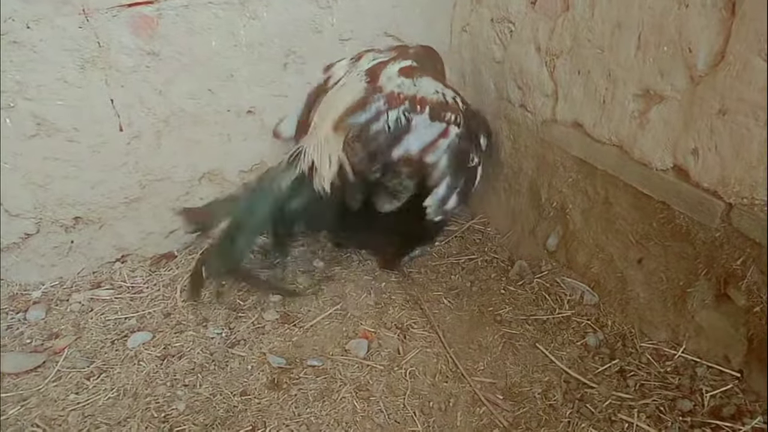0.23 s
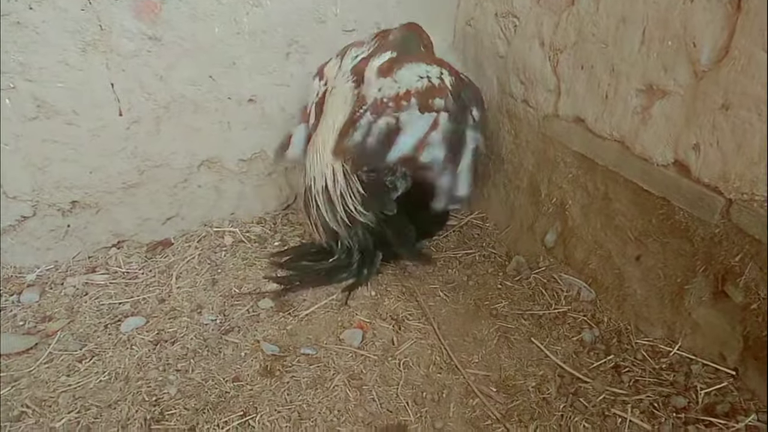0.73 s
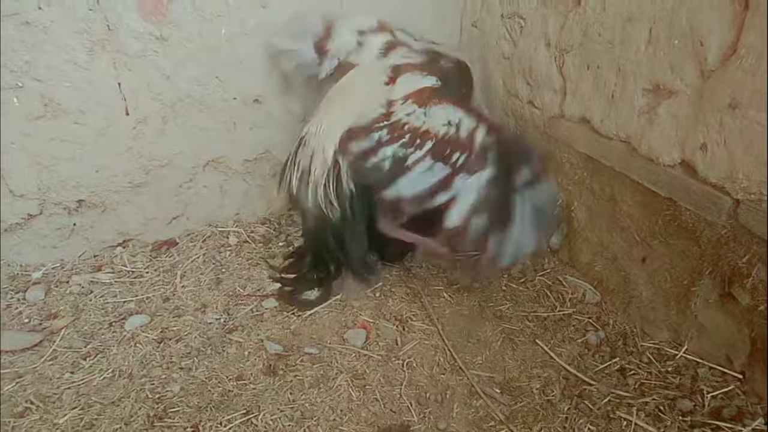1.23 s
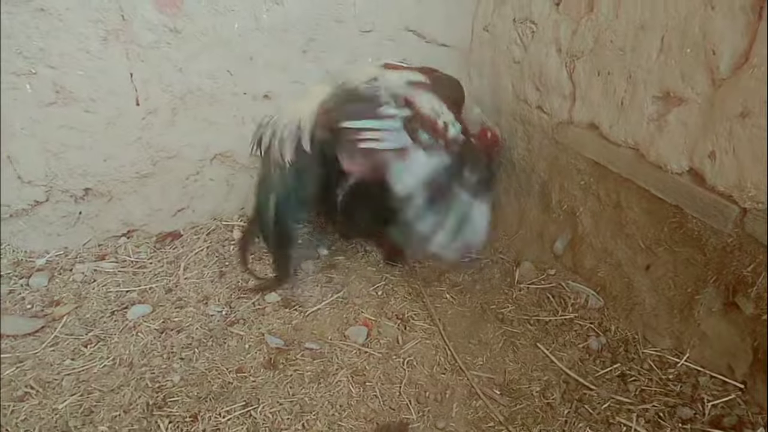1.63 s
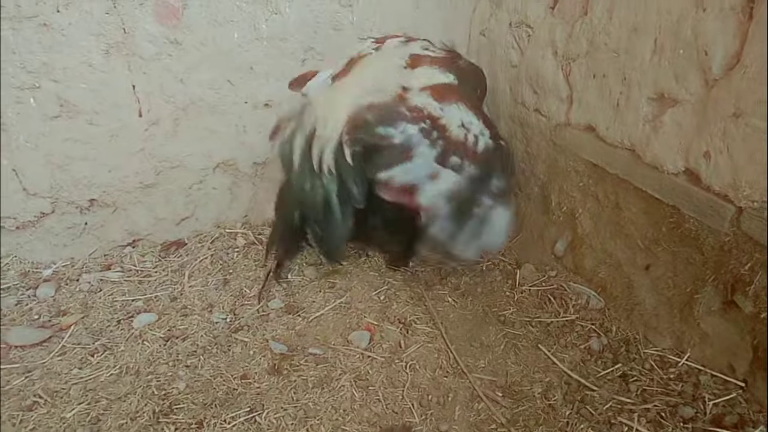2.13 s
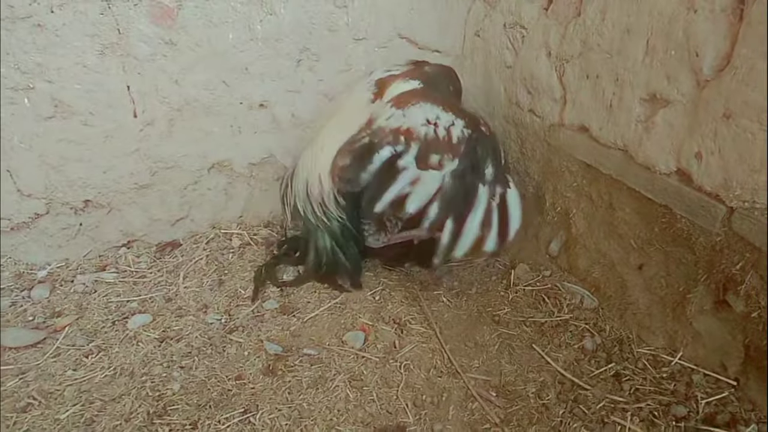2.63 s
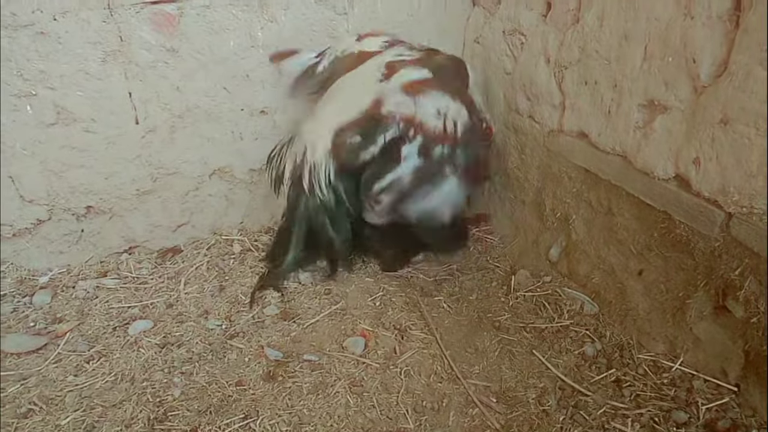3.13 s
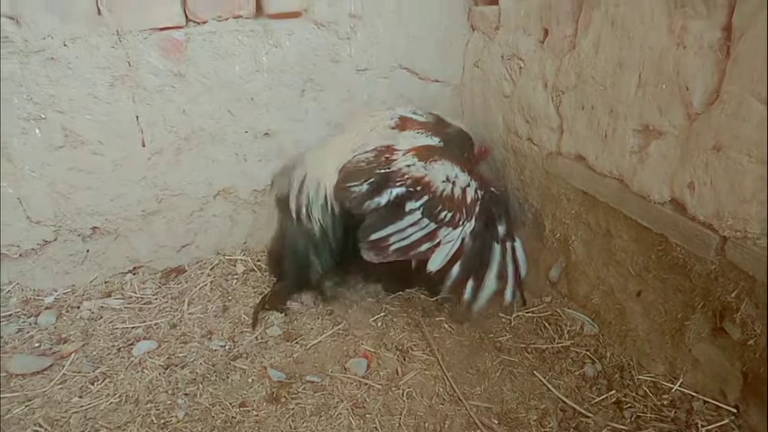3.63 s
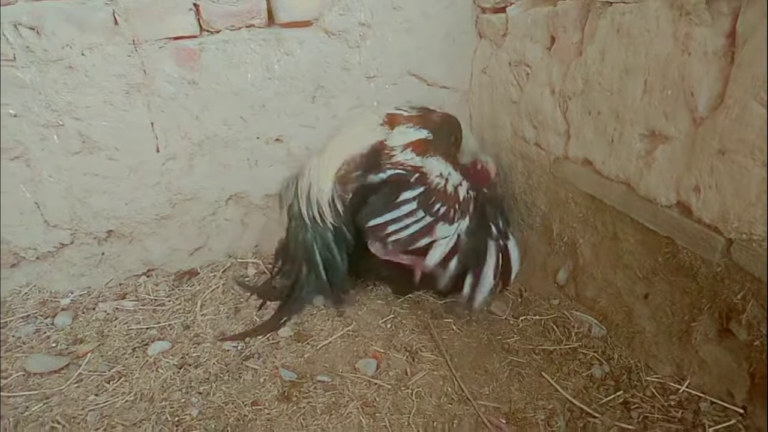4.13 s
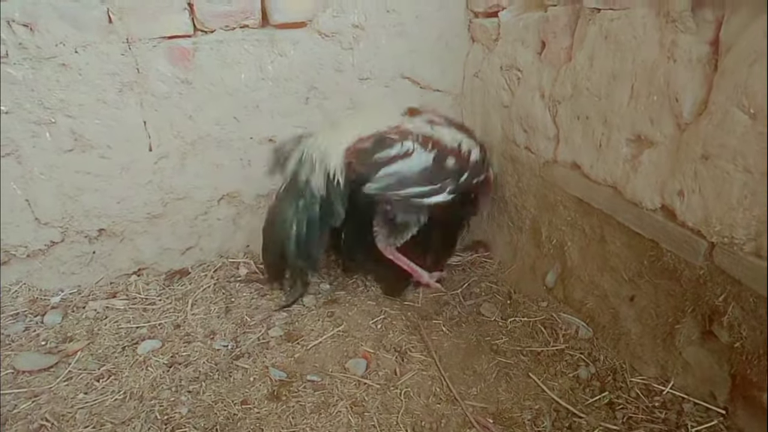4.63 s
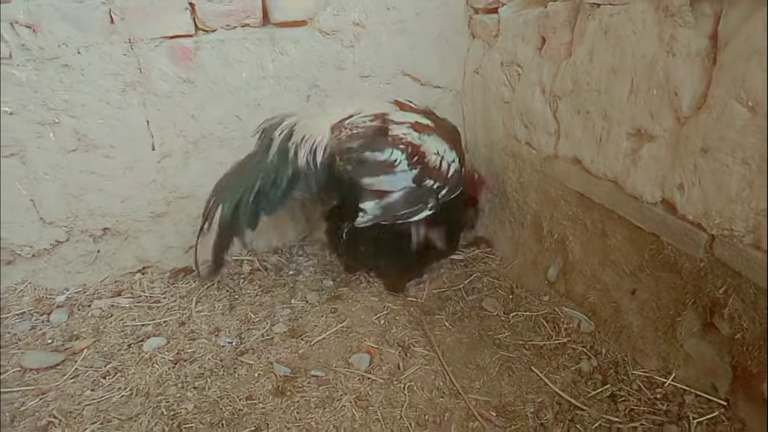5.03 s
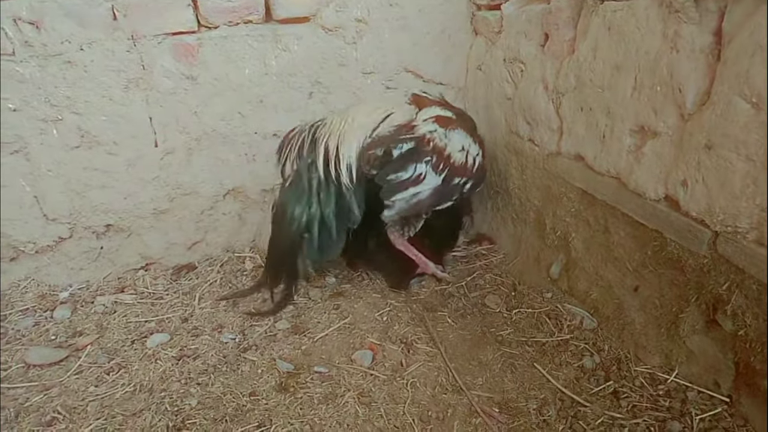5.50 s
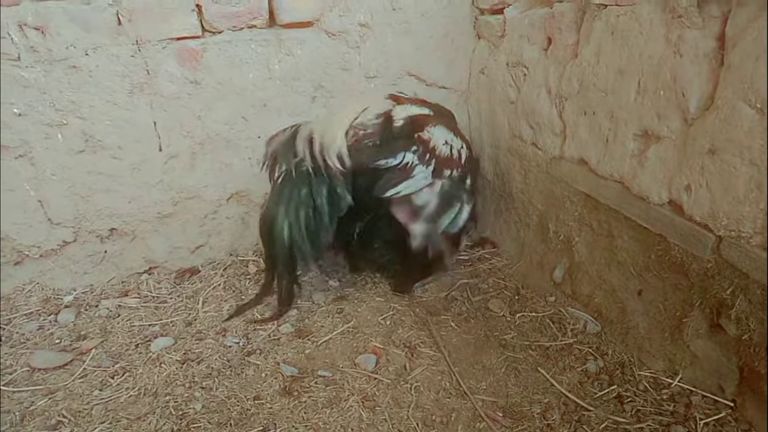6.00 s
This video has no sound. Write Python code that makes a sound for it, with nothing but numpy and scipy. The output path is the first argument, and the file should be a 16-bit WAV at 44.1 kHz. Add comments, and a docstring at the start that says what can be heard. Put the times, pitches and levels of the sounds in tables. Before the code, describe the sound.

Two chickens scuffle in straw with beating wings and hoarse hen rasps, while a rooster crows farther off.

```python
"""A rooster treads a hen in the corner of a mud-walled pen. From the start feathers and straw rustle
and snap, bodies push air, and small birds whistle outside. Near 1 s feet knock, wings beat and the
pinned hen rasps, turbulent air ringing her windpipe. From 1.8 to 3.4 s a second rooster crows farther
off, with wall echoes, its straining membranes rattling. Knocks, wing beats and rasps go on to the end."""
import sys
import numpy as np
from scipy import signal
from scipy.fft import rfft, irfft, next_fast_len
from scipy.io import wavfile
from scipy.ndimage import uniform_filter1d

SR = 44100
rng = np.random.default_rng(int(sys.argv[2]) if len(sys.argv) > 2 else 0)


def materialize(psi):
    """Save the field psi as 16-bit PCM at rate SR to the path in sys.argv[1].

    A 1-D psi becomes a single channel; in a 2-D psi each row is a channel.
    """
    bounded = np.clip(np.atleast_2d(psi).T, -1, 1)
    quanta = np.round(bounded * 32767).astype(np.int16)
    wavfile.write(sys.argv[1], SR, quanta)


N = 276066


def gain_of(db):
    return 10 ** (np.asarray(db) / 20)


def unit_rms(x):
    return x / np.sqrt(np.mean(x ** 2) + 1e-20)


def add(mix, start_s, sound):
    part = mix[round(start_s * SR):][:len(sound)]
    part += sound[:len(part)]


def edge_fades(count, fade_s):
    return signal.windows.tukey(count, min(2 * fade_s * SR / count, 1))


def curves(rows):
    """Columns after the first (time [s]), interpolated to the sample rate."""
    times_s, *columns = np.transpose(rows)
    t = np.arange(times_s[0], times_s[-1], 1 / SR)
    return [np.interp(t, times_s, column) for column in columns]


def filtered(x, spectrum):
    """Filter by (frequency [Hz], gain [dB]) points."""
    points_hz, points_db = np.transpose(spectrum)
    size = next_fast_len(len(x))
    hz = np.fft.rfftfreq(size, 1 / SR)
    gain_db = np.interp(np.log(hz + 1), np.log(points_hz + 1), points_db)
    return irfft(rfft(x, size) * gain_of(gain_db), size)[:len(x)]


def colour(x, spectrum):
    return unit_rms(filtered(x, spectrum))


def resonate(x, hz, width_hz):
    """One resonance: shift hz to zero, smooth, shift back."""
    carrier = np.exp(2j * np.pi * hz * np.arange(1, len(x) + 1) / SR)
    pole = np.exp(-np.pi * width_hz / SR)
    return 2 * (carrier * signal.lfilter([1 - pole], [1, -pole], x / carrier)).real


def wander(count, per_s):
    """Smooth random curve, rms 1, about per_s changes a second."""
    span = max(int(SR / per_s / 2), 1)
    return unit_rms(uniform_filter1d(uniform_filter1d(rng.standard_normal(count), span), span))


def grainy(count, lumps_db, per_s):
    """Noise in uneven lumps, rms 1."""
    return unit_rms(rng.standard_normal(count) * gain_of(lumps_db * wander(count, per_s)))


def bout(hold_s, level_db, rise_s, fall_s):
    """Gain of one movement: rise, hold, fall."""
    edge_db = -18.5
    shape_db, = curves([(0, edge_db), (rise_s, 0), (rise_s + hold_s, 0),
                        (rise_s + hold_s + fall_s, edge_db)])
    return gain_of(level_db + shape_db)


# drift of the resting level: (time [s], level [dB])
REST_DRIFT = [(0, 5.5), (.4, -1.5), (1.1, 1), (1.5, 2), (2.1, 0), (3.4, 5), (3.8, -0.5), (4.4, 1),
              (5.0, -2.5), (5.3, -2), (5.45, 2.5), (6.26, 0)]


def activity(bouts, rest_db, rise_s, fall_s):
    """Gain of bouts summed in power over a resting level; the birds are never quite still."""
    drift_db = np.interp(np.arange(N) / SR, *np.transpose(REST_DRIFT))
    sway_db = 2 * wander(N, per_s=4.3)
    power = gain_of(rest_db + drift_db + sway_db) ** 2
    for start_s, hold_s, level_db in bouts:
        add(power, start_s, bout(hold_s, level_db, rise_s, fall_s) ** 2)
    return np.sqrt(power)


# yard background: (frequency [Hz], gain [dB])
YARD_SPECTRUM = [(15, -66.5), (25, 4), (87, 18), (232, -37.5), (339, 3.5), (1010, -6.5), (1550, -7),
                 (2210, -16.5), (5570, -27.5), (7300, -9.5), (11300, -26.5), (14800, -8.5), (16500, -38.5)]


def yard(level_db):
    """Faint, slightly wavering outdoor noise."""
    return gain_of(level_db) * colour(grainy(N, lumps_db=.8, per_s=6), YARD_SPECTRUM)


def straw_crackle(per_s, spread_db):
    """Breaking straws: sparse, tiny noise bursts of uneven size."""
    sizes = gain_of(spread_db * np.minimum(rng.exponential(1, N), 4))
    breaks = rng.random(N) < per_s / SR
    envelope = signal.lfilter([1], [1, -.985], sizes * breaks)
    return unit_rms(envelope * rng.standard_normal(N))


# straw and down: (frequency [Hz], gain [dB])
DOWN_SPECTRUM = [(2940, -38), (5000, -20.5), (6020, -7), (8160, -16), (15000, 2.5), (16200, -12),
                 (16500, -26)]
# stiff quills: (frequency [Hz], gain [dB])
QUILL_SPECTRUM = [(590, -64.5), (1000, -9.5), (2290, -7), (2890, -4), (4450, -2), (5190, 2), (7210, -10.5),
                  (10000, -2.5), (13000, -35), (22000, -120)]
# bouts of movement: (start [s], hold [s], straw and down level [dB], quill level [dB])
RUSTLES = [(0.0, 0.0965, -47, -65), (0.183, 0.0074, -46.5, -76), (0.44, 0.09, -68.5, -64.5),
           (0.588, 0.112, -58, -84.5), (0.718, 0.05, -62, -65), (0.773, 0.043, -57.5, -75),
           (1.051, .03, -61, -66.5), (1.159, 0.029, -59, -65), (1.207, 0.065, -46, -52.5),
           (1.289, 0.064, -50.5, -51.5), (1.494, 0.034, -64, -60.5), (1.621, 0.0616, -50.5, -57.5),
           (1.718, 0.031, -64.5, -56), (1.844, 0.186, -59, -68), (2.128, 0.061, -62, -58.5),
           (2.198, 0.086, -52.5, -53.5), (2.306, 0.268, -54, -53.5), (2.79, 0.12, -56, -56),
           (2.936, 0.135, -53, -55.5), (3.12, 0.158, -57, -54), (3.435, 0.0876, -89, -64),
           (3.84, 0.018, -64, -94.5), (3.922, 0.011, -63, -82), (3.977, 0.054, -77.5, -60.5),
           (4.112, 0.048, -63.5, -64.5), (4.173, 0.068, -52, -62.5), (4.253, 0.089, -71, -60.5),
           (4.513, 0.195, -55, -64), (5.047, 0.051, -56.5, -67), (5.164, 0.00865, -58, -66),
           (5.33, .03, -77, -64.5), (5.527, 0.298, -65.5, -66), (6.009, 0.0086, -58, -66),
           (6.039, 0.11, -80.5, -65), (6.183, 0.075, -69.5, -66.5)]


def rustle():
    """Down crackles finely and quills scrape; breaking straws sound in both bands at once."""
    start_s, hold_s, down_db, quill_db = np.transpose(RUSTLES)
    down_gain = activity(zip(start_s, hold_s, down_db), rest_db=-65.5, rise_s=.022, fall_s=.023)
    quill_gain = activity(zip(start_s, hold_s, quill_db), rest_db=-69.5, rise_s=.022, fall_s=.023)
    straws = straw_crackle(per_s=86, spread_db=5.3)
    down = colour(grainy(N, lumps_db=1.5, per_s=300) + .4 * straws, DOWN_SPECTRUM)
    quills = colour(grainy(N, lumps_db=1.6, per_s=170) + .062 * straws, QUILL_SPECTRUM)
    return down_gain * down + quill_gain * quills


# pushed air: (frequency [Hz], gain [dB])
GUST_SPECTRUM = [(40, -23.5), (70, -18.5), (120, 0), (170, -1.5), (340, -7.5), (520, -15), (2000, -45.5),
                 (4000, -93)]
# pushes of air: (start [s], hold [s], level [dB])
GUSTS = [(0.0, 0.074, -66.5), (1.2, 0.114, -60), (1.31, 0.085, -61), (1.505, 0.072, -38.5),
         (1.62, 0.128, -58), (2.39, 0.033, -61), (2.51, 0.013, -47), (2.58, 0.103, -62.5),
         (2.8, 0.27, -58.5), (3.05, 0.0556, -43.5), (3.39, 0.0115, -65), (3.46, 0.059, -65.5),
         (3.66, 0.031, -68.5), (3.93, 0.028, -89.5), (4.17, 0.013, -54), (4.26, 0.042, -60),
         (4.55, 0.21, -63.5), (5.06, .03, -64.5), (5.52, 0.05, -59.5), (5.79, 0.015, -54),
         (6.1, .04, -63.5), (6.18, 0.034, -57.5)]


def gusts():
    """Wings and body push air in low puffs."""
    gain = activity(GUSTS, rest_db=-73, rise_s=.015, fall_s=.1)
    return gain * colour(grainy(N, lumps_db=2.2, per_s=50), GUST_SPECTRUM)


def impact(peak_db, centre_hz, t60_s, width_ratio, puff_gain):
    """A click and a noise puff dying over t60_s ring one broad resonance."""
    t = np.arange(6000) / SR
    drive = puff_gain * rng.standard_normal(len(t)) * gain_of(-60 * t / t60_s)
    drive[0] += 1
    ring = resonate(drive, centre_hz, width_ratio * centre_hz)
    ring = resonate(ring, centre_hz, 2 * centre_hz)  # soft contact: little far from the ring
    return gain_of(peak_db) * ring / abs(ring).max()


# small snaps: (time [s], peak [dB], centre [Hz], puff t60 [s])
TICKS = [(0.0127, -37.5, 13600, 0.0176), (0.0344, -40, 14700, 0.037), (0.0504, -35.5, 14400, 0.042),
         (0.122, -48.5, 13800, 0.03), (0.174, -37, 13500, 0.025), (0.206, -46, 13900, 0.0164),
         (0.6634, -53.5, 14400, 0.025), (.252, -46.5, 9000, .02), (.766, -51.5, 9000, .02),
         (0.7949, -42.5, 5660, 0.117), (1.2069, -36.5, 5840, 0.023), (1.5213, -39, 1520, 0.18),
         (1.6875, -36.5, 5400, 0.0335), (3.4411, -38, 5530, 0.0796), (3.835, -47.5, 13700, 0.018),
         (3.921, -62, 2074, 0.018), (3.8536, -46, 15100, 0.036), (3.881, -53.5, 1950, 0.034),
         (3.931, -25, 13800, 0.03), (4.001, -42.5, 5640, 0.035), (4.1742, -38, 9800, 0.038),
         (4.4956, -45.5, 4910, 0.021), (4.5085, -53, 3300, 0.026), (4.5295, -50, 3750, 0.0276),
         (5.306, -31, 5880, 0.0157), (2.2, -40, 14000, .03), (2.51, -43.5, 13610, .03),
         (5.5046, -39.5, 14600, 0.0325), (6.01, -39, 4074, 0.0216), (6.029, -42, 5600, 0.018),
         (6.168, -42.5, 4540, 0.03)]


def tick(peak_db, centre_hz, t60_s):
    """A claw, straw or quill snaps with a strong puff of noise."""
    return impact(peak_db, centre_hz, t60_s, width_ratio=.36, puff_gain=.6)


# small birds: (start [s], length [s], first pitch [Hz], last pitch [Hz], level [dB], jitter [ratio])
CHIRPS = [(0.25, 0.114, 4294, 4390, -61.5, 0.0096), (0.514, 0.104, 3850, 3594, -61.5, 0.13),
          (1.696, 0.0973, 2290, 4035, -60.5, 0.021), (3.474, .05, 2490, 3704, -58, 0.0923),
          (4.004, 0.0674, 2585, 3408, -62.5, 0.041)]


def chirp(length_s, first_hz, last_hz, level_db, jitter):
    """A gliding whistle, scratchy with pitch jitter."""
    glide_hz = np.linspace(first_hz, last_hz, round(length_s * SR))
    n = len(glide_hz)
    cycles = np.cumsum(glide_hz * (1 + jitter * wander(n, per_s=300))) / SR
    return np.sqrt(2) * gain_of(level_db) * np.sin(2 * np.pi * cycles) * signal.windows.tukey(n, .6)


# blows: (time [s], peak [dB], centre [Hz], puff t60 [s], width / centre [ratio])
KNOCKS = [(0.917, -61.5, 144, 0.06, 0.38), (0.959, -41, 533, 0.145, 0.96),
          (1.174, -50.5, 473, 0.0506, 0.33), (1.514, -36.5, 280, .08, .8), (2.527, -54, 880, 0.067, 0.58),
          (3.832, -58.5, 331.5, 0.11, 0.38), (3.93, -55, 170, 0.06, 0.243), (4.177, -33, 228, 0.04, 1.1),
          (4.305, -46.5, 264, 0.073, 0.28), (5.306, -41, 1042, 0.16, 0.113), (5.538, -41, 376, 0.069, 0.84),
          (6.006, -48, 1033, 0.06, 0.23), (6.171, -31.5, 1056, 0.07, 0.4)]


def knock(peak_db, centre_hz, t60_s, width_ratio):
    """Feet or body strike ground or wall, with little noise."""
    return impact(peak_db, centre_hz, t60_s, width_ratio, puff_gain=.023)


# wing noise: (frequency [Hz], gain [dB])
WING_SPECTRUM = [(59, -37.5), (100, -13), (173, -8), (388, 0.5), (555, -7), (872, -10.5), (1220, -18),
                 (1450, -22), (9000, -45), (11700, -76.5), (19800, -120)]
# wing strokes: (start [s], hold [s], level [dB])
WING_BEATS = [(1.197, .08, -54.5), (1.316, 0.041, -44), (1.507, .05, -41), (1.616, .08, -58),
              (4.477, 0.176, -57.5), (6.191, .05, -52)]


def wing_beat(hold_s, level_db):
    """A wing sweeps air and brushes the wall."""
    gain = bout(hold_s, level_db, rise_s=.012, fall_s=.04)
    sweep = colour(grainy(len(gain), lumps_db=3.6, per_s=89), WING_SPECTRUM)
    return gain * sweep * signal.windows.tukey(len(gain), .1)


# hen's windpipe resonances: (centre [Hz], width [Hz], level [dB])
WINDPIPE = [(645.8, 290, -2.5), (1267.5, 230, 0.5), (1658.5, 274, 2), (2374, 1400, -4.5), (3427, 540, -10),
            (4455, 800, -6.5), (6140, 390, -14), (8800, 1500, -22), (11000, 3000, -23) ]
# air noise between the resonances: (frequency [Hz], gain [dB])
BREATH_SPECTRUM = [(150, -42), (290, 8), (900, 13.5), (1900, 8.5), (2800, -25.5), (5400, -54), (12000, -46)]
# hen's calls: (start [s], swell [s], length before tail [s], first effort [dB],
# effort after swell [dB], windpipe tuning [ratio], treble tilt [dB/octave])
RASPS = [(1.347, 0.0343, 0.058, -39, -29, 0.915, 1.79), (2.589, 0.052, 0.117, -42.5, -30, 0.93, -1.5),
         (2.931, 0.043, 0.0495, -43.5, -29, 0.933, 0.5), (4.572, 0.079, 0.1688, -47.5, -31, 0.935, -.5),
         (5.557, 0.0337, 0.2155, -40.5, -28.5, 0.975, 1), (5.785, 0.021, 0.03485, -34.5, -38.5, 0.912, -4),
         (6.189, 0.039, 0.0481, -41, -36.5, 0.886, -.5)]


def hen_rasp(swell_s, length_s, first_db, swell_db, tuning, tilt_db_per_octave):
    """Turbulent air in uneven puffs rings the windpipe; no steady pitch."""
    sag_db_per_s, tail_s, tail_drop_db = 34, .0327, 38.5
    last_db = swell_db - sag_db_per_s * (length_s - swell_s)
    effort_db, = curves([(0, first_db), (swell_s, swell_db), (length_s, last_db),
                         (length_s + tail_s, last_db - tail_drop_db)])
    treble_db_per_octave = tilt_db_per_octave + .1363 * (swell_db - effort_db)  # brighter when weak
    air = grainy(len(effort_db), lumps_db=2.3, per_s=130)
    windpipe = np.zeros(len(air))
    for hz, width_hz, level_db in WINDPIPE:
        ring = resonate(air, hz * tuning, width_hz)
        ring = resonate(ring, hz * tuning, width_hz)
        treble_octaves = max(np.log2(hz / 1700), 0)
        windpipe += gain_of(level_db + treble_db_per_octave * treble_octaves) * unit_rms(ring)
    voice = unit_rms(unit_rms(windpipe) + gain_of(-3) * colour(air, BREATH_SPECTRUM))
    return gain_of(effort_db) * voice * edge_fades(len(air), fade_s=.005)


# rooster's throat response: (frequency [Hz], gain [dB])
THROAT_SPECTRUM = [(1500, -2), (2250, 6.5), (2650, -1.5), (2950, -10.5), (3450, 6), (4100, -20.5),
                   (4500, -28.5), (5300, -14.5), (6100, -24.5), (7000, -17.5), (10000, -25), (14000, -43.5)]
# air leaking through the throat: (frequency [Hz], gain [dB])
HISS_SPECTRUM = [(500, -18.5), (700, -16), (1300, -3.5), (2200, 5), (2800, -6), (3600, -3.5), (4500, -27)]
# crow, one list a note: (time [s], pitch [Hz], first partial [dB], second over first [dB],
# upper partials over first [dB], hoarseness [0-1])
CROW_NOTES = [
    [(1.835, 615, -58.5, -10, -8, 0.34), (1.861, 654.6, -32.5, -18, -7, 0.45),
     (1.9, 720, -29, -14, -24.5, 0.246)],
    [(1.885, 800, -34.5, 1, -5.5, 0.49), (1.92, 838, -41, 8, -2.5, 0.58),
     (1.96, 834.3, -35.5, 4.5, -1, 0.258), (2.02, 807.6, -39.5, 9.5, -1, 0.017),
     (2.052, 798.3, -34, -4.5, -7.5, 0.98), (2.09, 789.3, -50, 6, 4.5, 0.944),
     (2.17, 807.3, -61.5, -6, -0.5, 0.65)],
    [(2.175, 692, -36.5, -13, -8.5, 0.12), (2.203, 745, -25.5, -13, -13.5, 0.343),
     (2.225, 730, -31.5, -10, -10.5, 0.276)],
    [(2.21, 880, -48.5, 14, 3.5, 0.34), (2.255, 906.9, -46, 10, 0.5, 0.34),
     (2.285, 868.4, -29, -3.5, -11.5, 0.48), (2.315, 830, -29.5, -9.5, -12, 0.693),
     (2.335, 800, -45.5, -10.5, -11, 0.47)],
    [(2.32, 740, -39, -3.5, -5.5, 1), (2.365, 709, -34, -2.5, -8, 0.193),
     (2.405, 752.3, -21.5, -20, -16, 0.033), (2.425, 780, -32, -6.5, -9, 0.195)],
    [(2.41, 860, -31.5, 2.5, -7, 0.4), (2.43, 877.9, -38, 2, 0, 0.5), (2.498, 894.4, -34, 2.5, -3, 0.173),
     (2.576, 860.2, -33, -2.5, -5, 0.32), (2.652, 851.1, -33, 4.5, 1, 0.4),
     (2.70, 844, -43.5, -5, -1, 0.716), (2.77, 838.7, -55.5, 1.5, 1.5, .4),
     (2.855, 825.2, -50, -1, 3, 0.48)],
    [(2.68, 560.4, -54.5, 2, 18, 0.44), (2.70, 560.7, -55, 2, 22, 0.563),
     (2.77, 586.4, -63, 9.5, 9.5, 0.72), (2.82, 620.7, -46, 3, 3.5, 0.99),
     (2.87, 659.2, -33, -9, -10, 0.935), (2.93, 615, -46.5, -18, 10, 1)],
    [(2.84, 830, -49.5, 9.5, 11, 0.5), (2.89, 807.2, -38, 0.5, -5, .35),
     (2.968, 800.2, -29.5, -3, -5, 0.14), (3.035, 779.4, -30.5, -7.5, -16, 0.071),
     (3.055, 724.7, -34, -6.5, -17.5, 0.073), (3.135, 707.8, -34, -9.5, -8, 0.093),
     (3.175, 672.9, -31, -23, -14.5, 0.124), (3.2, 620.8, -37, -11.5, -6, 0.069),
     (3.25, 591, -45, -12, 5, 0.1411), (3.32, 542.8, -48, -12.5, 0, 0.31),
     (3.42, 505, -54.5, -16.5, -8, 0.68), (3.44, 510, -83, -4.5, 11.5, .2)],
]


def crow_note(rows):
    """Partials on a pitch; a straining membrane rattles and smears each into noise."""
    hz, first_db, second_over_db, upper_over_db, hoarse = curves(rows)
    second_db, upper_db = first_db + second_over_db, first_db + upper_over_db
    n = len(hz)
    jitter = (.0064 + .008 * hoarse) * wander(n, per_s=170)
    cycles = np.cumsum(hz * (1 + jitter)) / SR
    points_hz, points_db = np.transpose(THROAT_SPECTRUM)

    def throat_db(multiple):
        return np.interp(np.log(multiple * hz), np.log(points_hz), points_db)

    dulling_db = 20 * np.maximum(1 - hz / 860, 0)  # as the pitch falls below 860 Hz, the upper partials fade faster
    uppers_db = [upper_db + throat_db(k) - throat_db(2.8826) - dulling_db * (k - 3) for k in range(3, 17)]
    tone = np.zeros(n)
    for k, level_db in enumerate([first_db, second_db] + uppers_db, start=1):
        neck_sway_db = .45 * (k - 1) * wander(n, per_s=20)
        rattle = 1 - .6 * hoarse + .7 * hoarse * wander(n, per_s=150)
        tone += gain_of(level_db + neck_sway_db) * rattle * np.sin(2 * np.pi * k * cycles)
    hiss = colour(rng.standard_normal(n), HISS_SPECTRUM)
    tone += gain_of(np.maximum(second_db, upper_db) - 8.5) * hoarse * hiss
    # alternate strong and weak cycles put lines between the partials
    tone *= 1 + .25 * hoarse * wander(n, per_s=80) * np.sin(np.pi * cycles)
    # a slack second membrane beats against the first
    beat_hz = 58 * (1 + .21 * wander(n, per_s=23))
    beat_depth = np.minimum(.081 + .52 * hoarse, .6)
    tone *= 1 + beat_depth * np.sin(2 * np.pi * np.cumsum(beat_hz) / SR)
    return np.sqrt(2) * tone * edge_fades(n, fade_s=.012)


def walls(x, t60_s, echo_db):
    """Direct sound plus sparse, low-passed wall echoes of random sign."""
    taps = np.zeros(SR // 2)
    slots = np.arange(200, len(taps) - 20, 20)
    taps[slots + rng.integers(0, 20, len(slots))] = rng.choice([-1., 1.], len(slots))
    decay = gain_of(-60 * np.arange(len(taps)) / SR / t60_s)
    echoes = signal.lfilter([1], [1, -.6], taps * decay)
    return x + gain_of(echo_db) * signal.fftconvolve(x, echoes / np.linalg.norm(echoes))[:N]


def scene():
    """Far voices and the near scuffle, each with echoes, over dry rustle, gusts and yard noise."""
    far, near = np.zeros(N), np.zeros(N)
    for start_s, *settings in CHIRPS:
        add(far, start_s, chirp(*settings))
    for events, source in (TICKS, tick), (KNOCKS, knock), (WING_BEATS, wing_beat), (RASPS, hen_rasp):
        for start_s, *settings in events:
            add(near, start_s, source(*settings))
    for rows in CROW_NOTES:
        add(far, start_s=rows[0][0], sound=crow_note(rows))
    far = filtered(far, [(400, -28.5), (540, 1.5)])  # a small beak sends out no bass
    far = walls(far, t60_s=.1893, echo_db=-7.5)
    near = walls(near, t60_s=.158, echo_db=-11.5)
    return (yard(level_db=-68.5) + rustle() + gusts() + near + far)[None]


# small microphone: (frequency [Hz], gain [dB])
MICROPHONE_RESPONSE = [(25, -14.5), (45, -1), (60, -3.5), (5000, 0.5), (6400, 0.5), (6900, -8.5),
                       (8200, -6), (12000, -6.5)]


def record(dry):
    """Microphone colour, then the band limit."""
    heard = filtered(dry[0], MICROPHONE_RESPONSE)
    lowpass = signal.firwin(511, cutoff=15850, window=("kaiser", 9), fs=SR)
    return signal.oaconvolve(heard, lowpass, "same")[None]


dry = scene()
out = record(dry)
materialize(out)
```